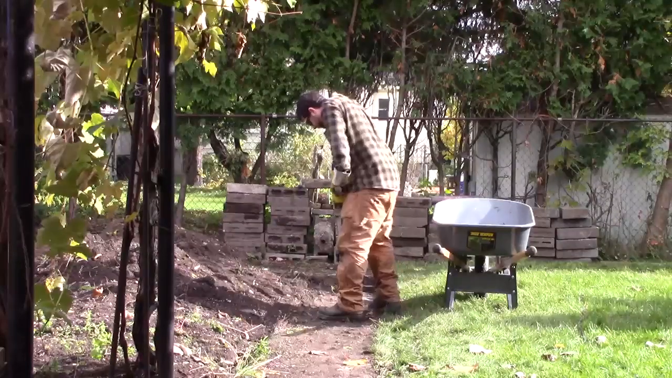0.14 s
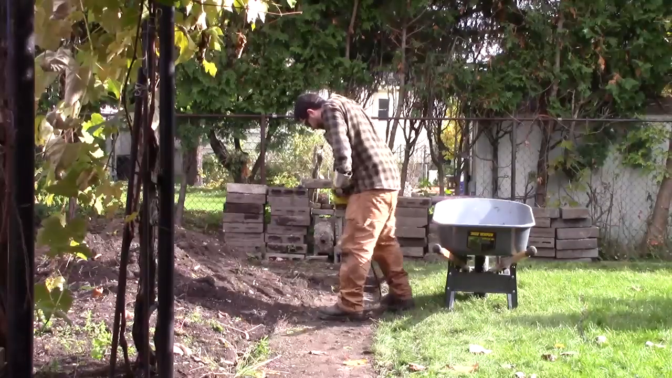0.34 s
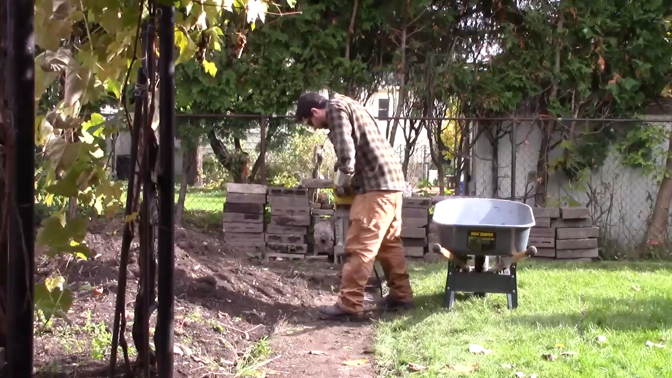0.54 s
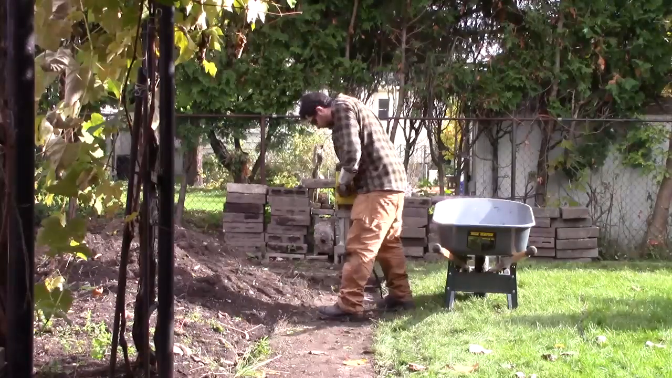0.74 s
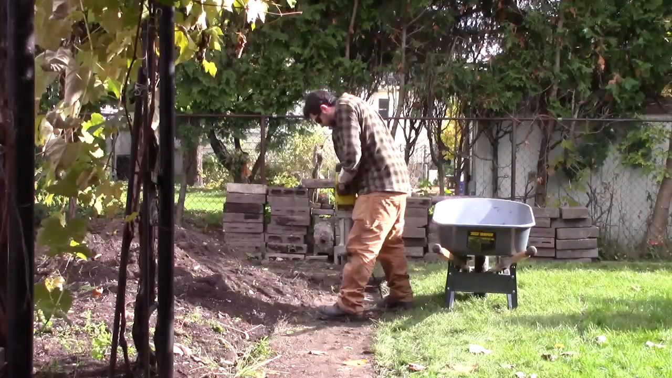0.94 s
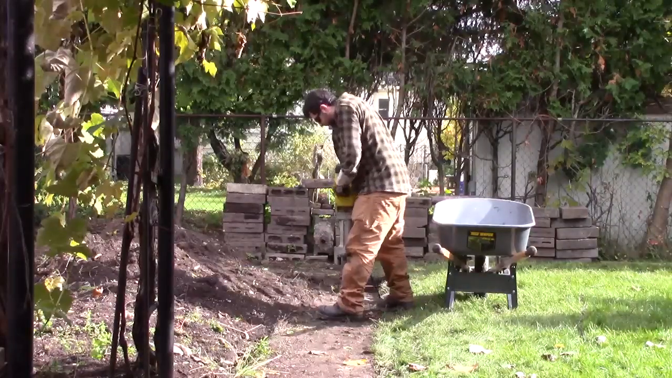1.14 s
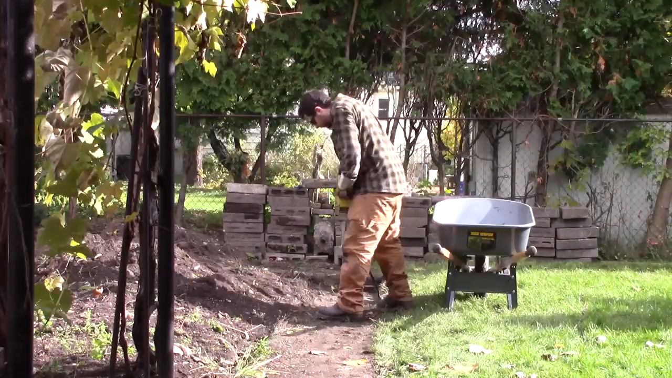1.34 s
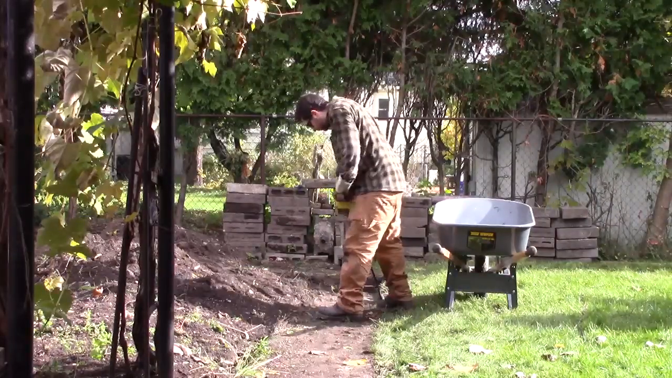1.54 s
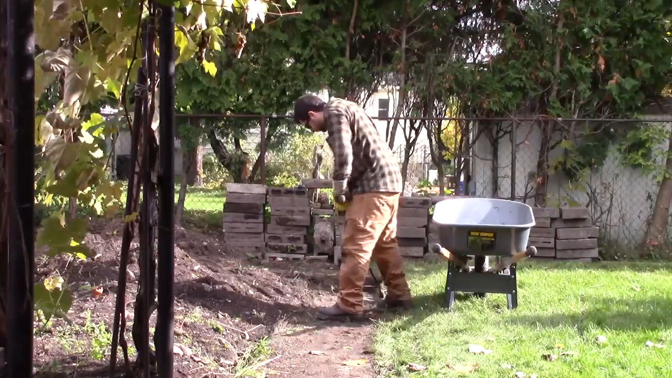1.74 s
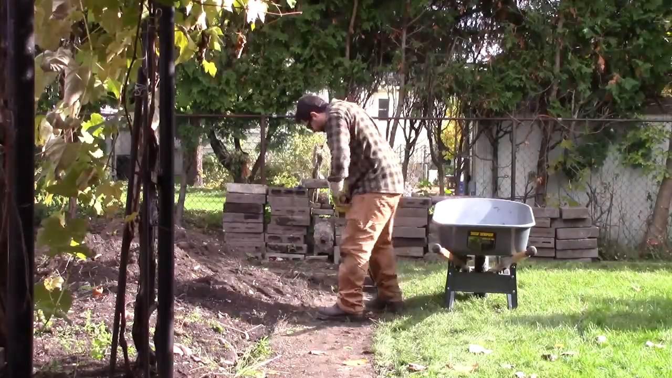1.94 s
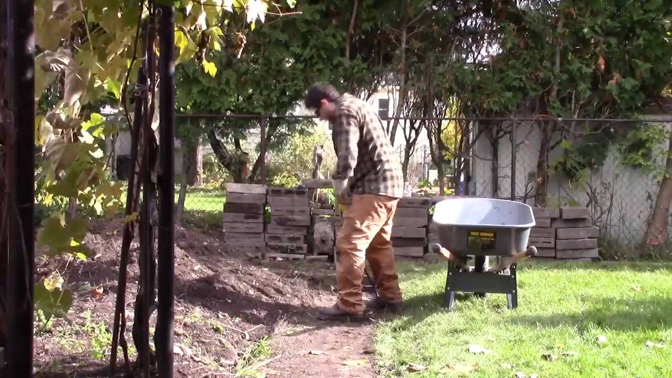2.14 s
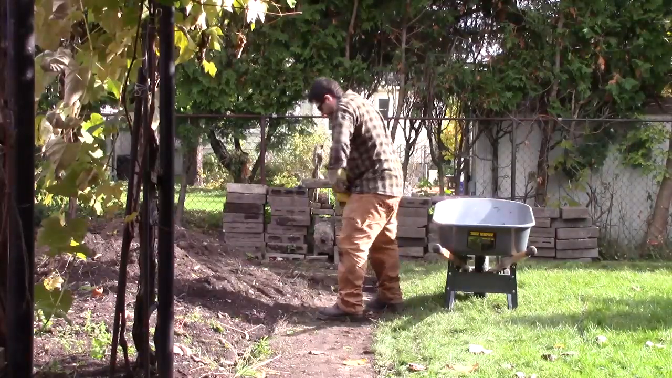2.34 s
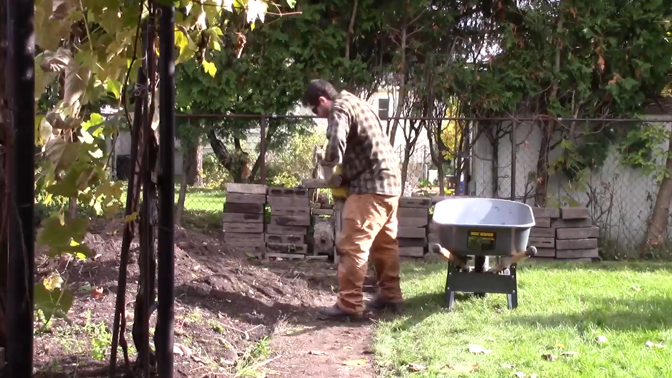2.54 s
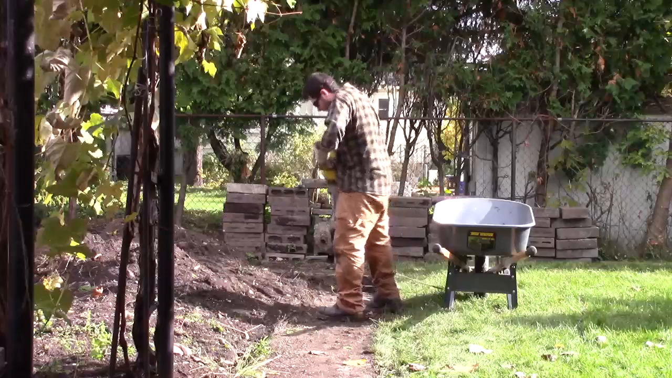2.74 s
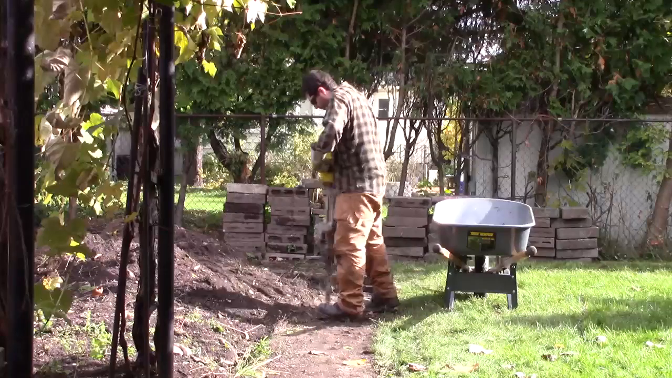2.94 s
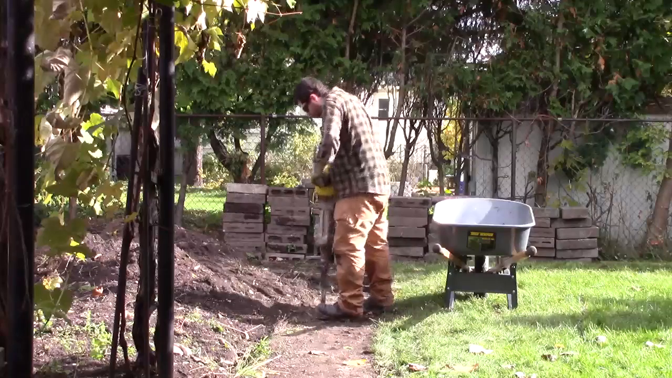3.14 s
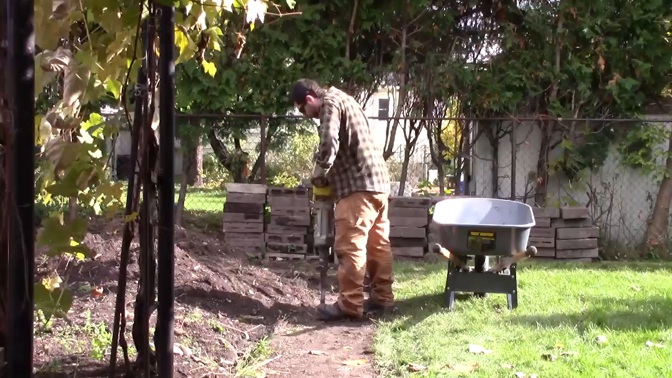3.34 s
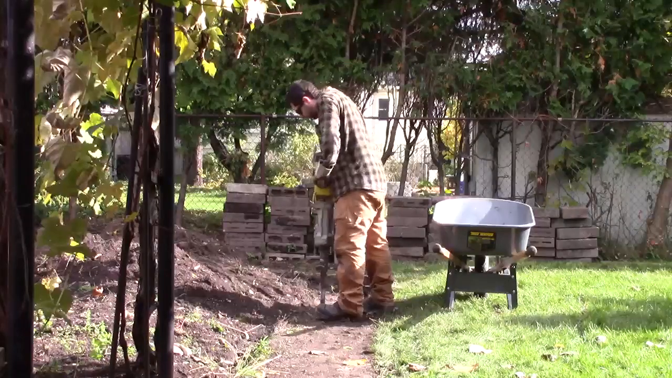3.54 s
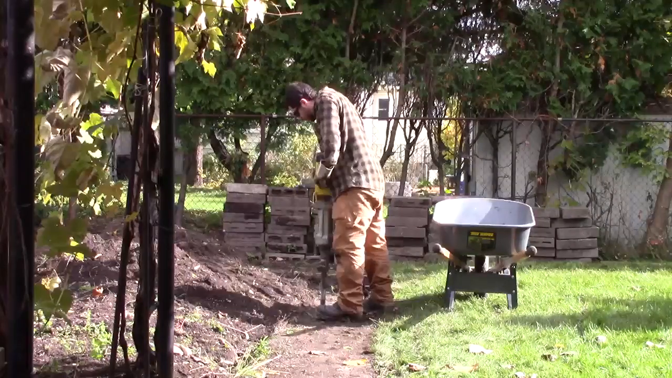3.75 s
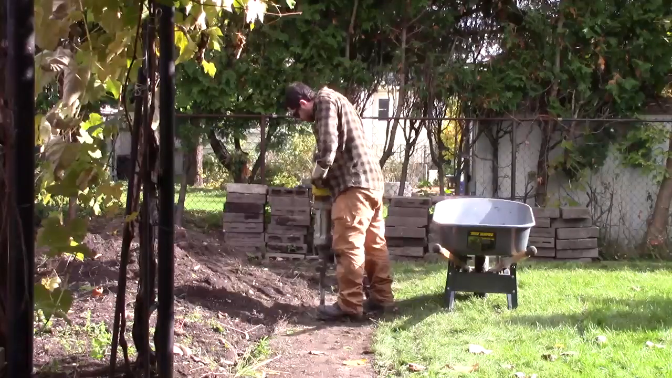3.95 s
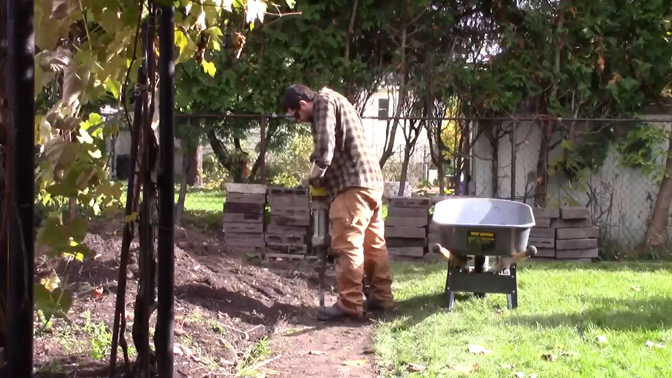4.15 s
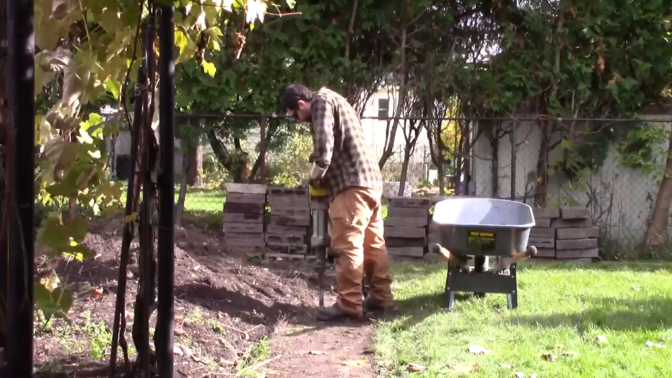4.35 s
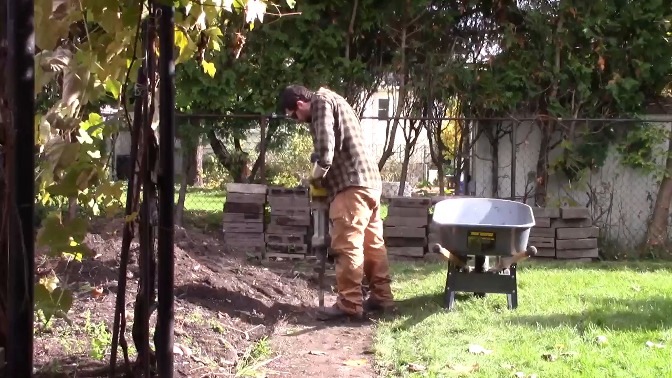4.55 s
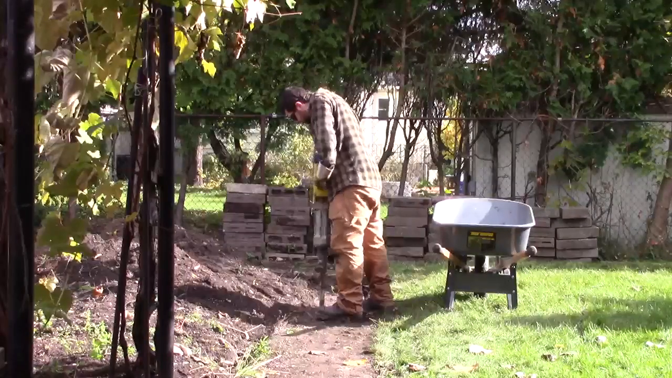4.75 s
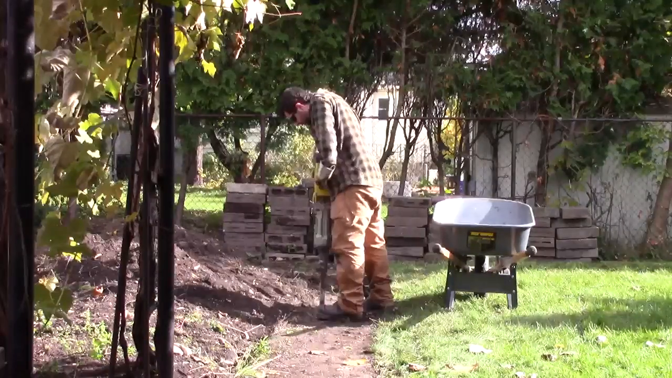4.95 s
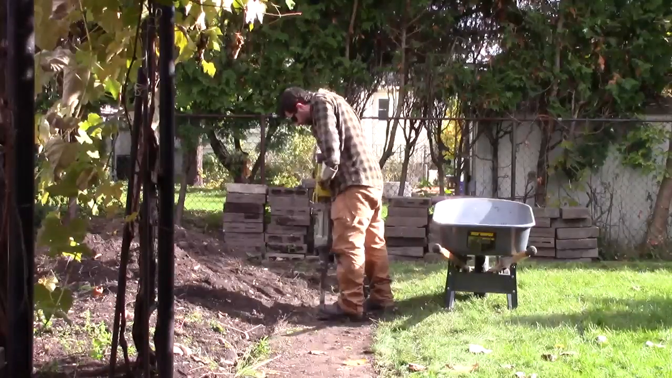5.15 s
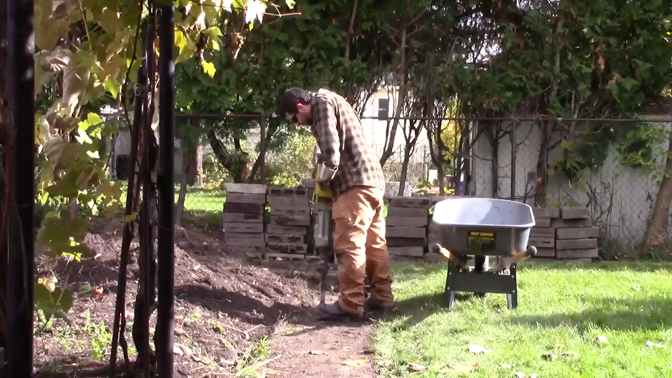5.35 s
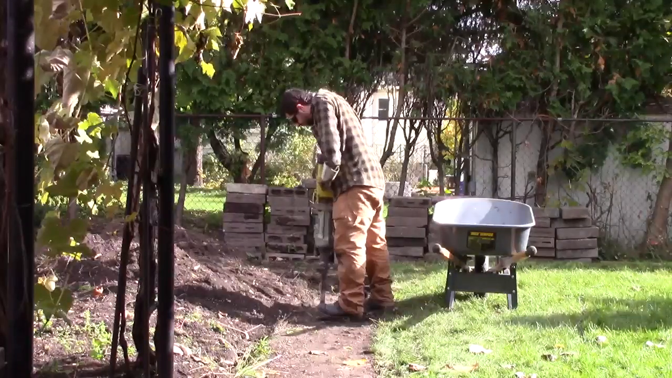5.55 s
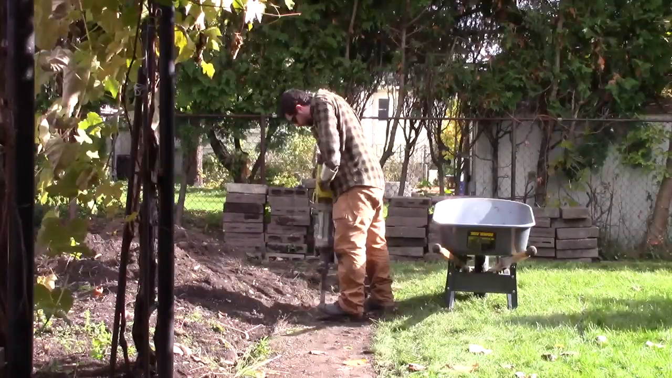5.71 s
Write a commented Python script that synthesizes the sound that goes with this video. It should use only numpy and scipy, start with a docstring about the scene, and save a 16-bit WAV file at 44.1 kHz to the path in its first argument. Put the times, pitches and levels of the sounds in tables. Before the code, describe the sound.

An electric jackhammer pounds concrete fast and evenly in a backyard, stops and winds down, clinks and thuds onto a new spot, then hammers again.

```python
"""An electric jackhammer breaks a concrete path in a backyard, heard from a few metres away.
At first each blow excites modes of housing, slab and steel bit and a noise burst of cracking concrete, over
gear whine (swept harmonics), fan air and rattle (shaped noise); ground, pavers, fence and house reflect it.
The motor then coasts down, the idle tool scrapes and clinks, and it is set down with a deep thud on a new spot.
There it spins up and strikes again; throughout, a limiter lowers the level briefly at loud peaks."""
import sys
import numpy as np
from scipy import signal
from scipy.fft import rfft, irfft, next_fast_len
from scipy.io import wavfile
from scipy.ndimage import uniform_filter1d, minimum_filter1d, map_coordinates

SR = 44100
rng = np.random.default_rng(int(sys.argv[2]) if len(sys.argv) > 2 else 0)


def bounce(signal):
    """Save signal as a 16-bit WAV file at the path given by the first command-line argument."""
    frames = np.transpose(np.atleast_2d(signal))
    limited = np.clip(frames, -1, 1)
    pcm = np.round(limited * 32767).astype(np.int16)
    wavfile.write(sys.argv[1], SR, pcm)


N = 254898
TIME = np.arange(N) / SR
AGE = np.arange(SR // 3) / SR  # time since a mode was struck, s

# All levels are relative; each sound is scaled where it is made.
# pulls of the trigger: (on [s], off [s], first blow [s], bit lifted [s])
RUNS = [(-1, 1.92, .0512, 2.29), (3.38, 6, 3.5272, 6)]
# crank speed under power, which shifts as the worker leans on the tool: (time [s], speed [strokes/s])
PACE = [(0, 13.35), (.38, 13.5), (.52, 13.95), (.75, 14.204), (1.33, 14.185), (1.6, 15.069), (1.84, 15.327),
        (1.92, 14.685), (3.38, 12.206), (3.8, 12.206), (4.3, 12.376), (5.2, 12.162), (5.78, 12.279)]
SPIN_UP_S, COAST_S = .0978, .3945  # time constants
INRUSH_EFFORT = .46  # extra effort at switch-on
MESH_PER_STROKE = 124  # gear teeth meeting in one crank turn
# the spot of slab worked in each run: (knock [dB], clank [dB], fan air [dB])
SPOTS = [(-16.5, -14.5, -18.5), (-7, -9.5, -23.5)]
# gear whine at full effort: (time [s], level [dB], rise as the piston draws back [dB])
WHINE = [(.42, -22.5, 12), (.55, -28, 3), (.75, -23.5, 1), (1.2, -21.5, 2), (1.55, -24, 5), (1.8, -27, 0),
         (2.05, -22, 0), (3.5, -21, 0), (3.7, -28.5, 0), (5.78, -27, 0)]
# the slab's thud dies as it breaks up and grows as the bit seats itself: (time [s], level [dB])
THUD = [(.42, -12), (.55, -17), (1, -15.5), (1.5, -29.5), (2.2, -16), (4, -18.5), (4.55, -11), (5.78, -8)]
# how hard the concrete cracks under the bit: (time [s], level [dB])
BITE = [(.1, -25.5), (.48, -17), (.65, -6.5), (1.1, -6.5), (1.45, -13), (1.8, -6.5), (1.95, -4),
        (2.13, -4.5), (2.27, -6.5), (3.53, -21), (3.8, -9.5), (5.05, -10.5), (5.78, -3.5)]
# how freely the bit rings: (time [s], level [dB])
RING = [(.2, -39), (2.05, -37.5), (2.27, -46), (3.53, -30), (3.8, -13), (4, -8.5), (4.6, -12), (5, -14),
        (5.78, -12)]
KNOCK_PER_THUD, RATTLE_PER_BITE = 0.38, 0.21  # dB per dB
# random spread from blow to blow: thud, knock, crack, clank, ring [dB]
STROKE_SCATTER_DB = [2.2, 1.2, 1.5, 2.5, 1.5]
# small extra thumps and bumps: the bit rebounds while working or coasting, later the loose tool is set down:
# (time [s], thud [dB], knock [dB], crack [dB], clank [dB], free ring of the bit [dB])
BUMPS = [(0.003, -18, -17.5, -33, -23.5, -35), (2.16, -23, -26, -22, -31, -44),
         (2.291, -35, -47, -25.5, -31, -49), (2.559, -54, -36, -34.5, -50, -48),
         (3.086, -18, -16, -27, -33, -46), (3.103, -32, -13, -12, -40, -44),
         (3.129, -28, -22, -17.5, -49, -50), (3.185, -44, -26, -29, -47, -55),
         (3.197, -35, -26.5, -30.5, -42, -56), (3.228, -38, -40, -36, -49, -65)]
# low modes of housing and slab: (frequency [Hz], level [dB], t60 [s])
THUD_MODES = [(159.6, -8, 0.058), (230, -2, 0.081), (274.3, -6.5, 0.12)]
# higher modes of housing and slab: (frequency [Hz], level [dB], t60 [s])
KNOCK_MODES = [(332.7, 1.5, 0.093), (372.2, -5, 0.13), (443, 7, 0.067), (483, -17, 0.12), (587, 5.5, 0.06),
               (750, -9.5, 0.07), (839, -3.5, 0.05), (1034, -5.5, 0.07)]
# the steel bit pressed on the slab: (frequency [Hz], level [dB], t60 [s])
CLANK_MODES = [(6135, 2, 0.046), (6235, -6, 0.06), (6345, -2, 0.037), (6560, -13.5, 0.06),
               (6840, -12.5, 0.027), (8730, -12.5, .03), (9200, -15.5, 0.033)]
# the steel bit ringing freely: (frequency [Hz], level [dB], t60 [s])
RING_MODES = [(3180, -25, .3), (3574, -13, .25), (3765, -10, .15), (3825, -6, 0.24), (4080, -12, 0.2),
              (5998, -2, 0.24), (6188, 0, 0.38), (5890, -8, 0.15), (8605, -6, .22), (8700, -14, .15)]
# the slack bit in its holder: (frequency [Hz], level [dB], t60 [s])
SLACK_MODES = [(1980, 3, .15), (2450, -3, .06), (2700, 2, 0.06), (3830, -2, 0.22), (3900, -2, 0.15),
               (6070, -11, .12)]
# the steel bit holder: (frequency [Hz], level [dB], t60 [s])
HOLDER_MODES = [(2215, -17.5, 0.04), (2370, -17, 0.017), (3613, -8.5, 0.022), (3743, 0.5, 0.027),
                (3980, -8, 0.017), (3940, -18, 0.047), (4100, -1, 0.018), (4350, -1, .03),
                (4500, -9, 0.031), (6110, -5, 0.039), (7400, -2.5, 0.012)]
# the hollow motor housing: (frequency [Hz], level [dB], t60 [s])
HOUSING_MODES = [(440, -9.5, 0.12), (783, -3.5, 0.069), (997, 7, 0.055), (1384, -4.5, 0.18),
                 (1603, 5.5, 0.035), (2080, -0.5, 0.017), (2370, -7.5, 0.05)]
# the ground under the tool: (frequency [Hz], level [dB], t60 [s])
GROUND_MODES = [(78, -5, 0.17), (105, -2.5, 0.29), (186, 5, 0.15)]
# spectrum of cracking concrete: (frequency [Hz], level per Hz [dB])
CRACK = [(300, -21.5), (900, -3.5), (1600, -2), (2600, 1), (3300, 1), (3800, 7), (4600, -5.5), (5500, -6),
         (7400, -8), (9000, -3.5), (10300, -27.5)]
# spectrum of rattling and grit: (frequency [Hz], level per Hz [dB])
RATTLE = [(150, -2.5), (400, 14), (1500, -2.5), (2600, 6.5), (3200, 5.5), (3700, 8.5), (4200, 0.5),
          (4700, 6), (5400, 2.5), (6300, 5.5), (7000, -2.5), (8000, -5), (8800, 2), (10300, -21)]
# spectrum of the fan's air, also used for scraped grit: (frequency [Hz], level per Hz [dB])
AIR = [(25, -19), (100, -10.5), (200, 0.5), (400, -23), (600, 4), (800, -7.5), (1050, 2.5), (1300, 1.5),
       (1700, 3.5), (2300, 0.5), (3000, -14.5), (5000, -28), (10000, -100.5)]
# spectrum of the quiet yard: (frequency [Hz], level per Hz [dB])
YARD_NOISE = [(25, -19), (100, -8.5), (400, -4), (1000, -9.5), (3000, -11), (10000, -46)]
# reflections from ground, stacked pavers, fence and house: (delay [s], level [dB])
ECHOES = [(.0045, 1), (0.0134, -10.5), (0.028, -13.5), (.0325, -10.5), (.041, -24.5)]
# decay of the yard's diffuse tail: (frequency [Hz], t60 [s])
YARD = [(200, 0.6), (1500, 0.37), (4000, 0.55), (10000, 0.18)]
# the idle tool scrapes along as it is moved: (middle [s], half length [s], level [dB])
SCRAPES = [(2.42, 0.0083, -30.5), (2.567, 0.043, -32), (2.69, 0.029, -36), (2.84, 0.048, -37),
           (3.062, 0.019, -43), (3.212, 0.051, -35)]
# the slack bit taps its holder: (time [s], level [dB])
CLINKS = [(2.557, -33), (2.765, -48), (2.839, -37), (3.005, -37), (3.105, -31), (3.184, -27)]
# the tool's whole weight lands: (time [s], level [dB])
SET_DOWN = (3.125, -20.5)
TOP_HZ = 10500  # upper band limit


def amp(db):
    """Decibels to amplitude gain."""
    return 10 ** (np.asarray(db) / 20)


def unit(x):
    """Scale to rms 1."""
    return x / np.sqrt(np.mean(x ** 2) + 1e-20)


def unit_attack(x):
    """Scale so that the first 12.5 ms have rms 1."""
    return x / np.sqrt(np.mean(x[:SR // 80] ** 2) + 1e-20)


def along(points, hz):
    """Interpolate (frequency, value) points on a logarithmic frequency axis."""
    f, v = np.transpose(points)
    return np.interp(np.log(hz + 1), np.log(f + 1), v)


def curves(rows):
    """Interpolate one value per sample for each column after the time."""
    s, *cols = np.transpose(rows)
    return [np.interp(TIME, s, c) for c in cols]


def wobble(rate):
    """A smooth random curve with rate knots a second."""
    knots = rng.standard_normal(int(N * rate / SR) + 4)
    return map_coordinates(knots, [TIME * rate / SR])


def filtered(x, gain):
    """Linear filtering: the spectrum of x times a gain that depends on frequency."""
    size = next_fast_len(N + 8192)
    return irfft(rfft(x, size) * gain(np.fft.rfftfreq(size, 1 / SR)), size)[..., :N]


def coloured(x, spectrum):
    """Spectral shaping that leaves the power of white noise unchanged."""
    norm = np.sqrt(np.mean(amp(along(spectrum, np.linspace(0, SR / 2, 2048))) ** 2))
    return filtered(x, lambda hz: amp(along(spectrum, hz)) / norm)


def add(track, s, sound):
    """Superpose a sound on the track at s seconds."""
    start = round(s * SR)
    part = sound[max(-start, 0):N - start]
    track[max(start, 0):][:len(part)] += part


def ringing(modes):
    """Free damped vibration: one complex, exponentially decaying wave for each mode."""
    hz, db, t60 = np.transpose(modes)[:, :, None]
    return amp(db - 60 * AGE / t60) * np.exp(2j * np.pi * hz * AGE)


def resonate(x, modes):
    """Forced vibration: x convolved with a body's modes, at unchanged power for white noise."""
    response = ringing(modes).real.sum(0)
    return signal.fftconvolve(x, response / np.linalg.norm(response))[:N]


def chatter():
    """Many random tiny contacts that come in clumps: modulated noise of rms 1."""
    return unit(rng.standard_normal(N) * amp(4.8 * wobble(700) + 2.8 * wobble(90)))


def crank():
    """First-order spin-up and coasting: strokes per s, crank turns (whole at a blow), effort (near 1 at work)."""
    speed, turns, effort = np.zeros((3, N))
    for on, off, first_blow, _ in RUNS:
        torque = np.exp(-np.maximum(TIME - on, 0) / SPIN_UP_S)
        share = (1 - torque) * np.exp(-np.maximum(TIME - off, 0) / COAST_S)
        rate = share * np.interp(np.minimum(TIME, off), *np.transpose(PACE))
        angle = np.cumsum(rate) / SR
        now = TIME >= on
        speed[now] = rate[now]
        turns[now] = (angle - np.interp(first_blow, TIME, angle))[now]
        effort[now] = (share + INRUSH_EFFORT * np.sqrt(torque))[now]
    return speed, turns, effort


def striking():
    """Smoothed gate: 1 while the piston strikes, 0 while it rests."""
    down = sum((TIME > first_blow - .06) & (TIME < lifted) for _, _, first_blow, lifted in RUNS)
    return uniform_filter1d(down * 1., SR // 50)


def per_stroke(turns, peak_turn):
    """Periodic modulation: a swing of +-1 once a stroke."""
    return striking() * np.cos(2 * np.pi * (turns - peak_turn))


def stroke_bump(turns, peak_turn, sharpness):
    """Periodic modulation: a narrow bump rising to 1 once a stroke."""
    return striking() * np.exp(sharpness * (per_stroke(turns, peak_turn) - 1))


def spot():
    """Knock, clank and air levels of the spot being worked, per sample."""
    run = np.searchsorted(np.array(RUNS)[:, 0], TIME, side="right") - 1
    return np.array(SPOTS)[run].T


def blows(turns):
    """One impact per crank turn while the bit is down: rows (time [s], thud, knock, crack, clank, ring [dB])."""
    at = np.flatnonzero((np.diff(np.floor(turns)) == 1) & (striking()[1:] > .5))
    thud, bite, ring = (curves(level)[0][at] for level in (THUD, BITE, RING))
    knock, clank, _ = spot()[:, at]
    knock = knock + KNOCK_PER_THUD * (thud - thud.mean())
    levels = np.transpose([thud, knock, bite, clank, ring])
    scatter = STROKE_SCATTER_DB * rng.standard_normal(levels.shape)
    return np.column_stack([TIME[at], levels + scatter])


def yard_noise(level_db=-44.0):
    """The quiet yard: stationary noise with a shaped spectrum."""
    return amp(level_db) * unit(coloured(rng.standard_normal(N), YARD_NOISE))


def motor(speed, turns, effort, third_db=-16, band_hz=1700, slope_db=13, effort_db=18):
    """Gear meshing under varying load: harmonics grow on compression and draw-back, sagging into the blow."""
    hz = MESH_PER_STROKE * speed
    full_db, drawback_db = curves(WHINE)
    # a faster rotor has more momentum and sags less
    strain = np.minimum(1545 / (hz + 1), 1) ** 30
    sag = .16 * strain * (stroke_bump(turns, peak_turn=0, sharpness=3) - .3 * striking())
    # below working speed the teeth run slack and chatter
    slack = np.clip((1480 - hz) / 400, 0, 1)
    jitter = (.009 + .02 * slack) * wobble(260)
    rough = amp((2.6 + 1.6 * slack) * wobble(110) - 3 * slack)
    hz = hz * (1 - sag + jitter) + 1
    angle = 2 * np.pi * np.cumsum(hz) / SR
    mesh = np.zeros(N)
    for order, order_db in enumerate([0, -4, third_db], start=1):
        # the housing radiates best near band_hz, so a slow motor is heard by its overtones
        octaves = np.abs(np.log2(order * hz / band_hz))
        radiated_db = order_db - slope_db * octaves ** 2 / (1 + octaves / 2)
        mesh += amp(radiated_db) * np.sin(order * angle)
    # the piston compresses its air cushion before the blow
    compression = stroke_bump(turns, peak_turn=.79 + .09 * strain, sharpness=2.5)
    compression_db = 15 * compression - 6 * striking()
    drawback = stroke_bump(turns, peak_turn=.36, sharpness=3)
    level_db = full_db + effort_db * np.log10(effort) + compression_db + drawback_db * drawback
    return amp(level_db) * rough * mesh


def fan(speed, turns, effort, full_speed=11.9, whirr_db=2, effort_db=28, labour_db=2.2):
    """Turbulent flow: broad air noise at speed gives way to a whirr through housing modes when slow."""
    flow = np.clip(speed / full_speed, .5, .98)
    rush = unit(coloured(rng.standard_normal(N), AIR))
    whirr = amp(whirr_db) * resonate(rng.standard_normal(N), HOUSING_MODES)
    waver_db = 1.8 * wobble(35)
    labour = labour_db * per_stroke(turns, peak_turn=0.98)
    level_db = spot()[2] + effort_db * np.log10(effort) + labour + waver_db
    return amp(level_db) * (flow * rush + np.sqrt(1 - flow ** 2) * whirr)


def rattle(turns, effort, grit_db=-20.0, holder_db=-26, swing_db=2.0, effort_db=36,
           idle_db=-8, build_s=0.02, coast_db=-2):
    """Random contacts of loose bit and thrown grit: stronger as concrete breaks, weaker coasting or idling."""
    bite_db, = curves(BITE)
    working = sum(np.clip((TIME - first_blow) / build_s + 1, 0, 1) * (TIME < lifted)
                  for _, _, first_blow, lifted in RUNS)
    powered = sum((TIME >= on) & (TIME < off) for on, off, _, _ in RUNS)
    idle = 1 - np.maximum(working, TIME < RUNS[0][1])
    state_db = idle_db * idle + coast_db * (1 - powered)
    drive_db = RATTLE_PER_BITE * (bite_db - bite_db.mean()) + effort_db * np.log10(np.minimum(effort, 1))
    level = amp(state_db + drive_db + swing_db * per_stroke(turns, peak_turn=0.85))
    grit = amp(grit_db) * coloured(level * chatter(), RATTLE)
    holder = amp(holder_db) * resonate(level * chatter(), HOLDER_MODES)
    return grit + holder


def thumps(hits, thud_db=1, knock_db=1, lead=0.00401, swell=0.0034, scatter_db=1.5, spread=0.3):
    """Modal excitation: the piston's push rings housing and slab, in fixed phase, just before the bit bites."""
    out = np.zeros(N)
    for modes, column, gain_db in (THUD_MODES, 1, thud_db), (KNOCK_MODES, 2, knock_db):
        # bending waves are slower in the bass, so low modes swell later
        rise = swell + spread / np.array(modes)[:, :1]
        waves = ringing(modes).imag * (1 - np.exp(-AGE / rise))
        signs = (-1) ** np.arange(len(modes))
        strengths = amp(scatter_db * rng.standard_normal((len(hits), len(modes))))
        for hit, sizes in zip(hits, strengths):
            thump = unit_attack((signs * sizes) @ waves)
            add(out, hit[0] - lead, amp(hit[column] + gain_db) * thump)
    return out


def cracks(times, levels_db, crumble_t60=0.087, crumble_db=-8, holder_db=-6, housing_db=-12):
    """Brittle fracture: a snap and crumbling as decaying noise, whose shock rings bit holder and housing."""
    force = np.zeros(N)
    snap_t60 = .013
    shape = unit_attack(amp(-60 * AGE / snap_t60) + amp(crumble_db - 60 * AGE / crumble_t60))
    for s, db in zip(times, levels_db):
        add(force, s, amp(db) * shape)
    force = force * rng.standard_normal(N)
    holder = amp(holder_db) * resonate(force, HOLDER_MODES)
    housing = amp(housing_db) * resonate(force, HOUSING_MODES)
    return coloured(force, CRACK) + holder + housing


def steel(times, levels_db, modes, scatter_db):
    """Modal excitation: every impact rings the bit's modes at new random strengths and phases."""
    out, waves = np.zeros(N), ringing(modes)
    sizes = amp(scatter_db * rng.standard_normal((len(times), len(modes))))
    phases = np.exp(2j * np.pi * rng.random(sizes.shape))
    for s, db, strengths in zip(times, levels_db, sizes * phases):
        add(out, s, amp(db) * unit_attack((strengths @ waves).real))
    return out


def two_ports(x, side_db=-14, corner_hz=4000, delay=.0021):
    """Interference: a nearby reflection makes the treble differ between left and right."""
    side = amp(side_db) * filtered(
        x, lambda hz: hz / np.hypot(hz, corner_hz) * np.exp(-2j * np.pi * hz * delay))
    return np.array([x + side, x - side])


def echoes(x):
    """Specular reflection: nearby hard surfaces return delayed copies."""
    out = x.copy()
    for delay, db in ECHOES:
        add(out, delay, amp(db) * x)
    return out


def yard(x, wet_db=-16, side_db=-11, onset=0.0061):
    """Diffuse reverberation from fence, house and trees; left and right differ mostly in the treble."""
    hz, t, z = signal.stft(rng.standard_normal((2, SR // 2)), SR, nperseg=256)
    decay = amp(-60 * t / along(YARD, hz)[:, None]) * (1 - np.exp(-t / onset))
    tail = signal.istft(z * decay, SR, nperseg=256)[1]
    mid, side = signal.fftconvolve(x[None], tail / np.linalg.norm(tail[0]), axes=1)[:, :N]
    side = amp(side_db) * filtered(side, lambda f: (f + 600) / np.hypot(f, 3000))
    return amp(wet_db) * np.array([mid + side, mid - side])


def scrapes(housing_db=0, grit_db=-6):
    """Friction: the dragged bit rubs over grit and sounds through the hollow housing."""
    level = sum(amp(db) * np.exp(-((TIME - s) / half) ** 2 / 2) for s, half, db in SCRAPES)
    housing = amp(housing_db) * resonate(chatter(), HOUSING_MODES)
    grit = amp(grit_db) * coloured(chatter(), AIR)
    return level * (housing + grit)


def clinks():
    """Light impacts: the slack bit taps its holder and rings."""
    return steel(*np.transpose(CLINKS), SLACK_MODES, scatter_db=2.5)


def set_down():
    """Damped low modes: the ground gives a deep thud under the weight of the tool."""
    out = np.zeros(N)
    s, db = SET_DOWN
    add(out, s, amp(db) * unit_attack(ringing(GROUND_MODES).imag.sum(0)))
    return out


def scene():
    """Superposition of the hammer, its reflections and the quiet yard."""
    speed, turns, effort = crank()
    hits = np.vstack([blows(turns), BUMPS])
    times, _, _, crack_db, clank_db, ring_db = hits.T
    crack = cracks(times, crack_db - 3.5)
    clank = steel(times, clank_db + 0.5, CLANK_MODES, scatter_db=4.5)
    ring = steel(times, ring_db - .6, RING_MODES, scatter_db=3.0)
    taps = clinks()
    machine = motor(speed, turns, effort) + fan(speed, turns, effort) + rattle(turns, effort)
    impacts = echoes(crack + clank) + ring + taps + thumps(hits) + set_down()
    hammer = impacts + scrapes() + machine
    return two_ports(hammer + yard_noise()) + yard(hammer)


def record(dry, ceiling_db=0.43, release_db_per_s=260):
    """Peak limiting: gain ducks at loud peaks and recovers steadily; a steep low-pass sets the band limit."""
    excess = np.maximum(20 * np.log10(np.abs(dry).max(0) + 1e-9) - ceiling_db, 0)
    excess = -minimum_filter1d(-excess, size=65)  # looks ahead by under a millisecond
    recovery = release_db_per_s * TIME
    held_db = np.maximum.accumulate(excess + recovery) - recovery
    duck_db = uniform_filter1d(held_db, size=65)
    return filtered(dry * amp(-duck_db), lambda hz: 1 / (1 + (hz / TOP_HZ) ** 120))


dry = scene()
out = record(dry)
bounce(out)
```